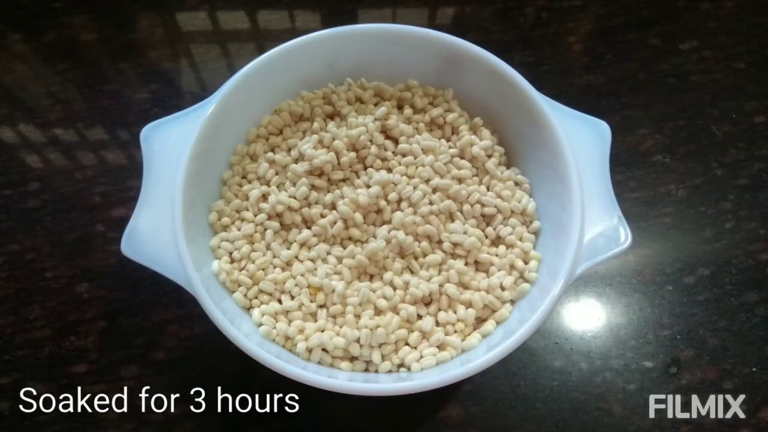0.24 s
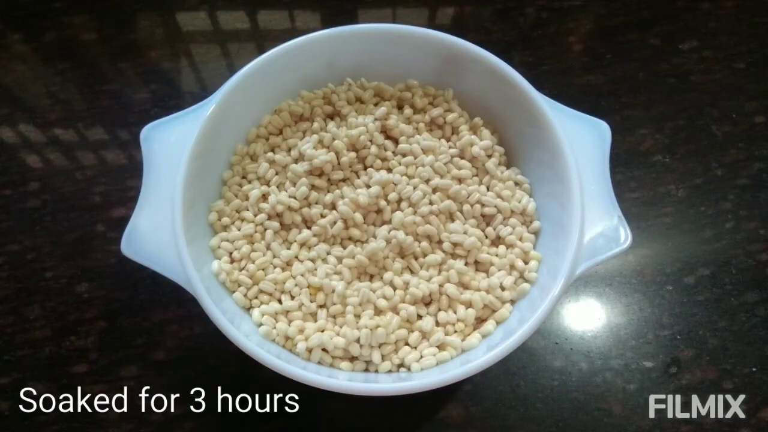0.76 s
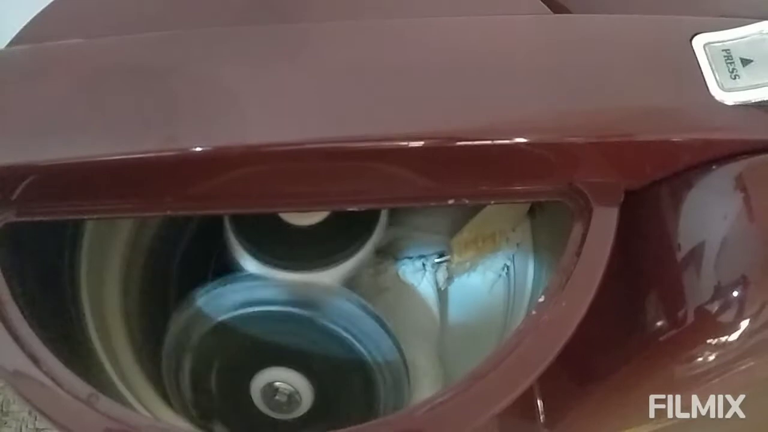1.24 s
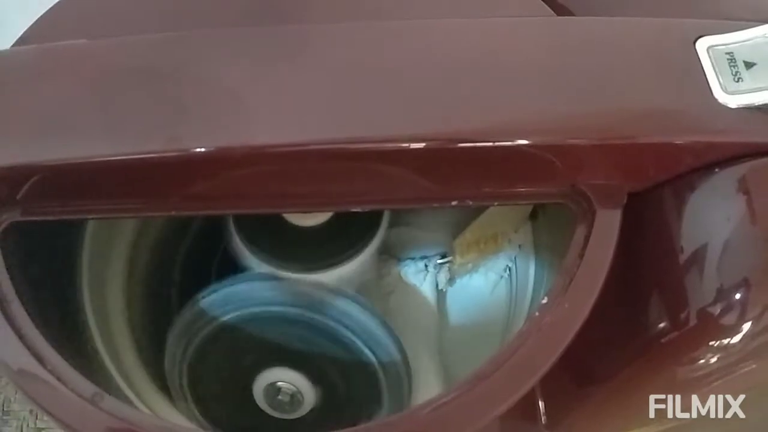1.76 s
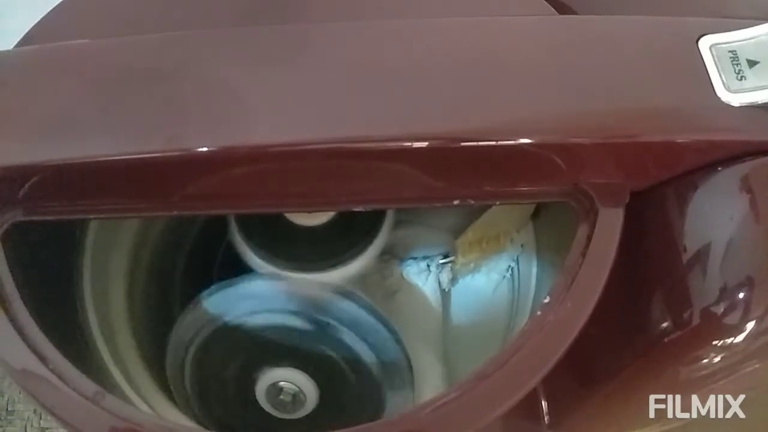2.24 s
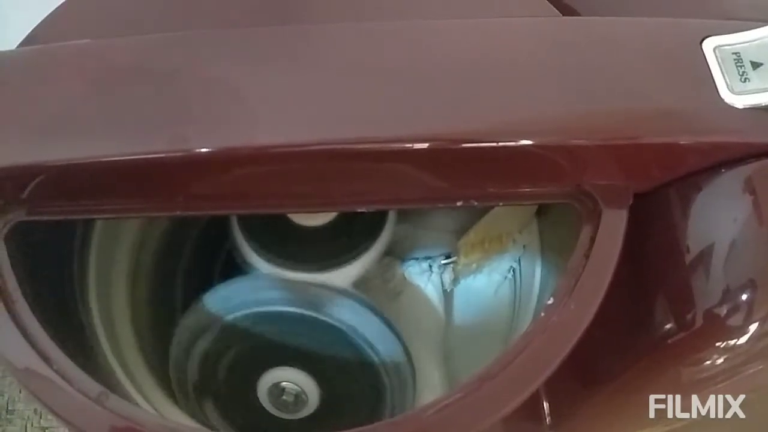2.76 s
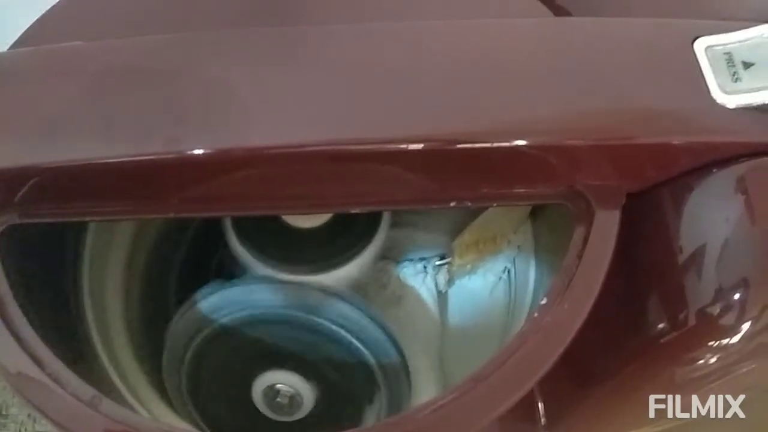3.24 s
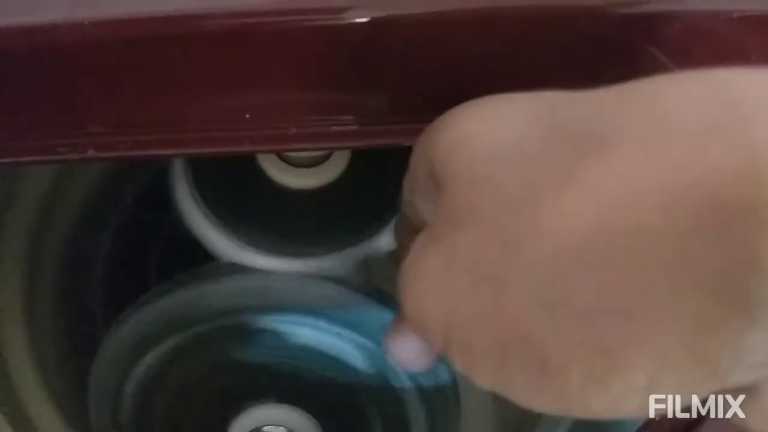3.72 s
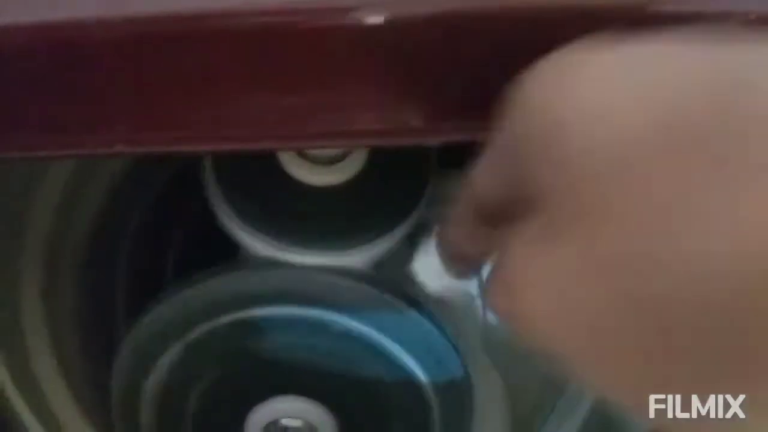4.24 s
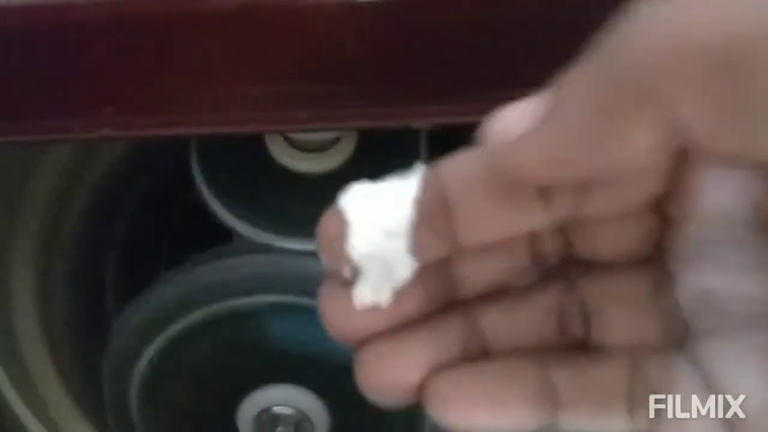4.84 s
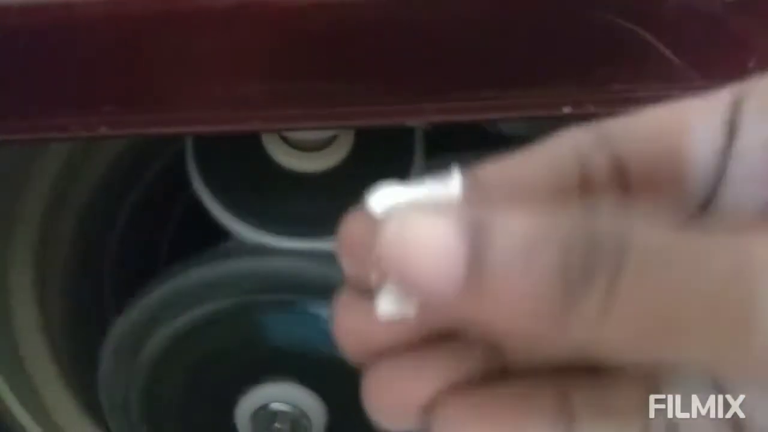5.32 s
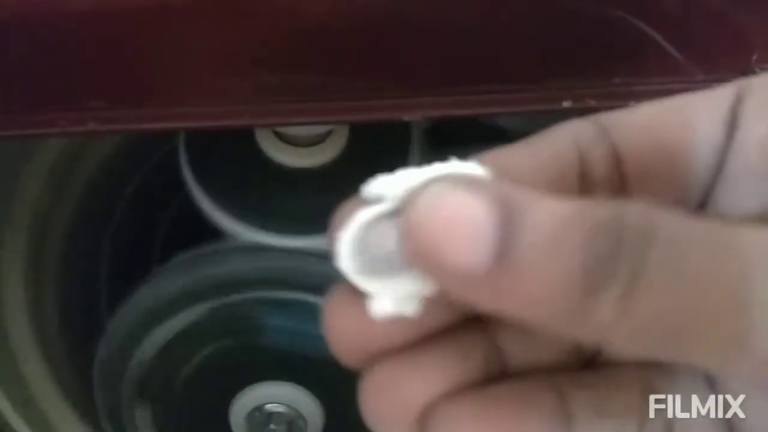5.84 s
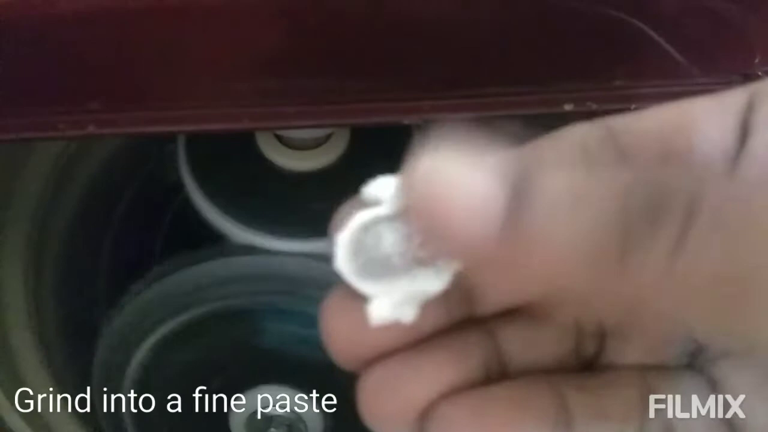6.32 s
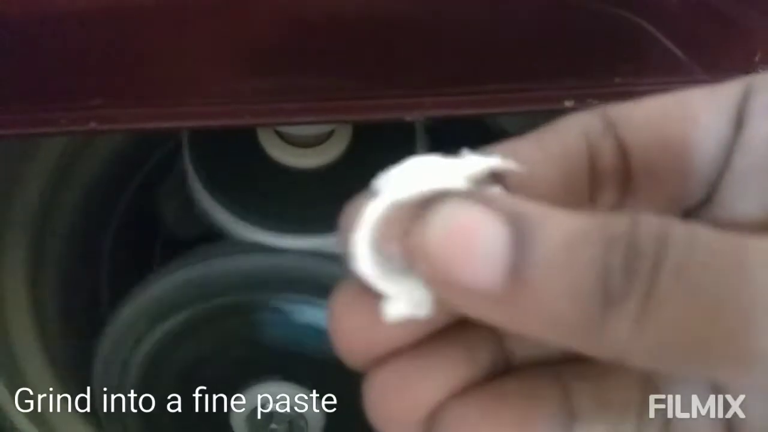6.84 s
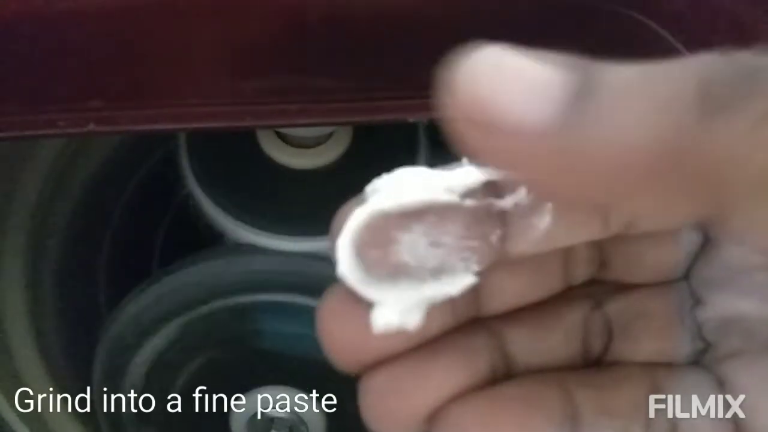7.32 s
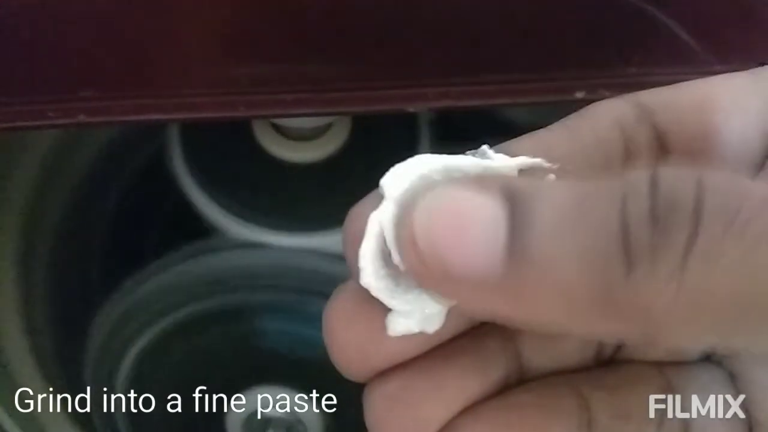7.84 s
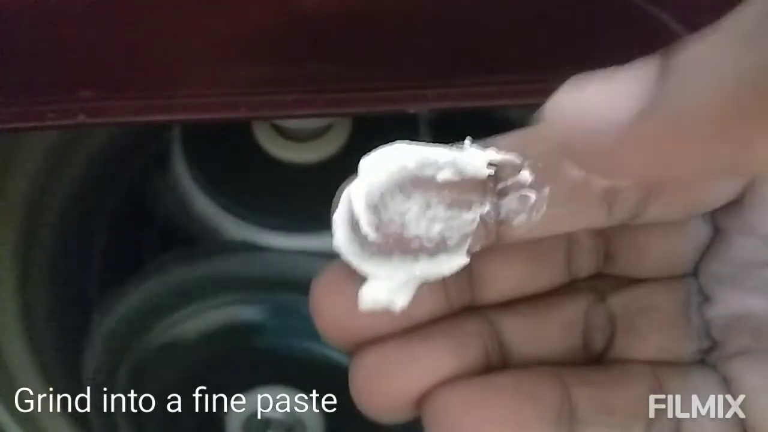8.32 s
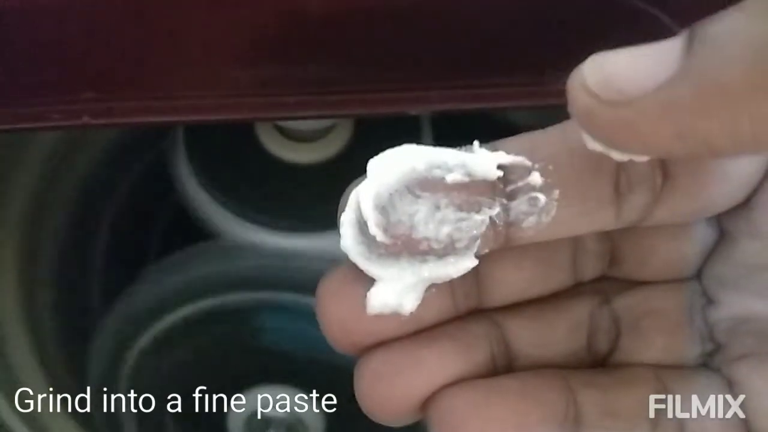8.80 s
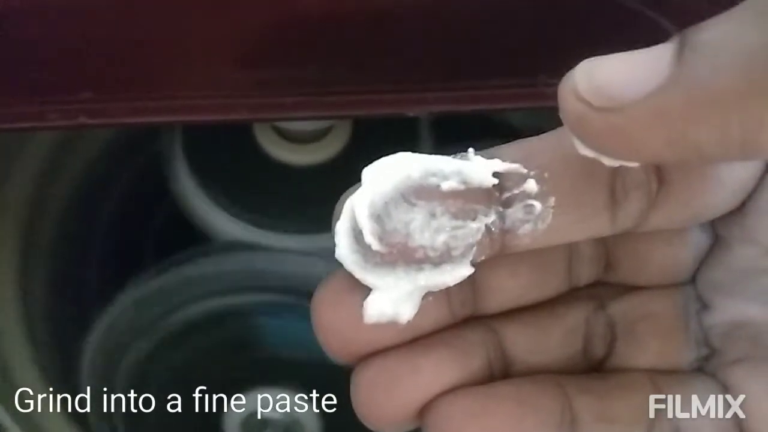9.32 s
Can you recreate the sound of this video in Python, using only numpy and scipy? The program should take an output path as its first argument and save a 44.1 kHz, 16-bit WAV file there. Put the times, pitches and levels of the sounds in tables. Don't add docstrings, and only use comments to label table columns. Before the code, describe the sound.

Silence first, then a continuous low drum rumble with mid-range stone rasp and bright, wet, slurping hiss pulsing slightly more than once a second. Soft hollow hums, squirts of grit and small ticks break the surface. The sound drops out for an instant and fades back in stronger, rougher and more crackly, swelling towards the end. Close stereo phone pickup, uneven between sides, slightly grainy, little room sound.

```python
import sys
import numpy as np
from scipy import signal
from scipy.fft import rfft, irfft, next_fast_len
from scipy.io import wavfile
from scipy.ndimage import uniform_filter1d, map_coordinates

SR = 44100
rng = np.random.default_rng(int(sys.argv[2]) if len(sys.argv) > 2 else 0)


def linear_from_db(decibels):
    return 10 ** (np.asarray(decibels, float) / 20)


def wrap_up_sound(samples):
    columns = np.atleast_2d(samples).T
    tamed = np.clip(columns, -1, 1)
    steps = np.round(tamed * 32767).astype(np.int16)
    wavfile.write(sys.argv[1], SR, steps)


N = 421596

# start in seconds, end in seconds.
SHOTS = [
    (.912, 3.386),
    (3.412, 9.56),
]
FADE_IN_S, FADE_IN_POWER, FADE_OUT_S = .28, .66, .055

# time in seconds, load on the stones in dB, grit between them in dB.
WORK = [(1.0, -29, -37), (2.2, -30, -35.5), (3.38, -26.5, -34.5), (3.42, -26, -31.5), (4.4, -27.5, -33),
        (5.25, -26, -32), (5.45, -25, -30), (6.3, -23.5, -28.5), (7.4, -22, -27.5), (7.9, -23.5, -25.5),
        (8.4, -21, -25.5), (9.0, -19.5, -27), (9.56, -20.5, -25)]
# time in seconds, swell in dB, half width in seconds.
LUMPS = [(1.18, 2.5, 0.022), (1.51, 3, 0.11), (1.93, 3.5, 0.065), (2.39, 4, 0.088), (2.7, 2.5, 0.097),
         (3.04, 1.5, 0.14), (3.22, 0, 0.017), (3.74, 1, 0.035), (3.91, 2.5, 0.038), (4.3, 4, 0.096),
         (4.758, 5.5, 0.071), (5.402, 9.5, 0.016), (5.5, 2.5, 0.052), (5.72, 0.5, 0.064),
         (5.95, 0.5, 0.038), (6.19, 5, 0.039), (6.88, 2, 0.067), (7.25, -2, 0.031), (7.61, 4.5, 0.13),
         (7.97, 2.5, 0.12), (8.14, 1.5, 0.048), (8.598, 3.5, 0.093), (8.78, 0, 0.042), (8.97, 3, 0.03),
         (9.2, -1, 0.027), (9.45, 2, 0.041)]
# pitch in Hz, width in Hz, level in dB.
DRUM = [(102.7, 10, -28.5), (125.1, 18, -9), (174.7, 20, -5), (201.2, 13, 2), (236.2, 18, -2),
        (292, 24, -2.5), (326.2, 25.7, -7), (372.6, 8.8, -1.5), (451.7, 11, -3), (506.3, 23, -13),
        (554.8, 26, -8.5)]
# pitch in Hz, width in Hz, level in dB.
WALL = [(672, 30.5, -5), (766, 48, 0), (834.4, 52, -1), (891, 35, -3.5), (990.6, 50, -4), (1126, 38, -5.5),
        (1212, 86, -9.5), (1371, 62, -13), (1555, 63, -20.5), (2016, 99, -24), (2508, 120, -23.5)]
# frequency in Hz, level in dB per Hz.
UNDER = [(12, -70), (20, -25), (65, -28.5), (101, -17), (204, -1.5), (493, -4.5), (554, -4), (640, -3.5),
         (830, -41.5), (1410, -120)]
# frequency in Hz, level in dB per Hz.
RASP = [(820, -25.5), (1400, 0), (1850, -7), (2250, -8), (2510, -7), (3400, -13.5), (3780, -14),
        (4200, -15.5), (5460, -15), (9240, -120)]
UNDER_DB = (-6.5, -9.5)
BOOM_HZ, BOOM_DB = 146, (2, -1.5)
WALL_DB, RASP_DB = (-6, -6.5), (-14, -19.5)
WALL_SWELLS, RASP_SWELLS = 0.7, 1

# frequency in Hz, level in dB per Hz.
SLURP = [(2240, -50.5), (3800, -12.5), (4660, -17.5), (5990, -6.5), (7010, -5.5), (8600, 1), (11200, -40),
         (18900, -120)]
HISS = [(4880, -25), (8300, -11), (9130, 7), (9640, 1.5), (10400, 6), (12200, 0.5), (15900, -24.5),
        (22000, -120)]
FIZZ = [(7000, -34.5), (11900, 5), (14300, 1), (15200, -1.5), (15900, -14)]
# swells a turn, depth in dB and phase in cycles
# in the first shot, depth in dB and phase in cycles in the second.
HISS_TURN = [(1, 0.49, 0.64, 0.89, -.16), (2, 1.8, -0.21, 1.6, .42), (3, 3.8, -.44, 1.3, .42),
             (4, 1.6, -.28, 0.22, -.13), (5, 2.3, -.2, 1.4, .27)]
FIZZ_TURN = [(1, 2.9, -0.071, 1.8, 0.0096), (2, 1.3, -0.31, 0.46, 0.41), (3, 0.28, 0.059, 0.16, -0.086),
             (4, 1, -0.23, 0.45, -0.5), (5, 0.27, 0.33, 0.58, -0.027)]
SLURP_TURN = [(1, 3.8, -.02, 1.8, .03), (2, 3.2, -0.16, 0.43, -0.4), (3, 0.25, -0.13, 0.9, 0.39),
              (4, 0.35, 0.16, 0.84, 0.54)]
TURN_HZ = 1.242
FIZZ_DB, SLURP_DB = (-1, -4), (-8, -7.5)
GRIT_PAN_DB, CRACK_PAN_DB = (-11, 0.5), (-12.5, 9.5)
SPURTS_PER_S, SPURT_DB, SPURT_S = 40, 2.1, .011

# frequency in Hz, width in Hz, seconds after the pass.
SCRAPE = [(14200, 900, -.028), (13000, 800, 0), (11800, 800, .022)]
SCRAPE_S, SCRAPE_DB = (.985, 3.345), (6, 3.5)
SCRAPE_HALF_S = .018

# time in seconds, pitch in Hz, level in dB.
RINGS = [(1.178, 298, -37), (1.192, 212, -38), (1.213, 448, -33), (1.282, 284, -28), (1.497, 296, -24.5),
         (1.503, 549, -34), (1.591, 119, -34), (1.62, 934, -37), (2.287, 292, -25), (2.393, 213, -27.5),
         (2.4, 398, -26.5), (2.728, 234, -35), (2.873, 280, -25.5), (2.965, 559, -34), (3.019, 373, -24),
         (3.054, 119.5, -31), (3.228, 810, -36), (3.228, 964, -31), (3.246, 297, -21), (3.756, 194, -21),
         (3.831, 1006, -31.5), (4.249, 740, -29), (4.76, 433, -28), (5.393, 324, -27), (5.393, 1085, -30),
         (5.498, 193, -23.5), (5.78, 193, -28), (5.87, 202, -28), (5.943, 201, -22), (6.13, 204, -25.5),
         (6.223, 552, -26), (6.409, 444, -23.5), (6.764, 289, -23), (6.803, 445, -22), (6.885, 716, -30),
         (6.908, 800, -27), (7.07, 383, -28), (7.1, 280, -29), (7.2, 248, -30), (7.483, 242, -20.5),
         (7.587, 380, -30), (7.55, 197, -21), (7.628, 199, -14), (7.7, 199, -21), (8.329, 198, -26),
         (8.552, 184, -18), (8.591, 775, -24), (8.597, 293, -24.5)]
RING_DB, RING_RISE_S, RING_FALL_S = 1, .014, 0.036

# time in seconds, pitch in Hz, swell in dB.
BURSTS = [(1.2, 9700, 10), (1.303, 10800, 13.5), (1.37, 11400, 14.5), (1.409, 11500, 10),
          (1.472, 12100, 10), (1.67, 15300, 7), (1.741, 11200, 13.5), (1.787, 13800, 16), (1.836, 14000, 8),
          (2.367, 8700, 6), (2.368, 10700, 15.5), (2.461, 13000, 11), (2.571, 10200, 16.5),
          (2.611, 12700, 12), (2.615, 15000, 10), (2.653, 10550, 16), (3.043, 11900, 9), (3.106, 13700, 3),
          (3.143, 11500, 3), (3.147, 14600, 4), (3.274, 12900, 10.5), (3.702, 10700, 3), (3.746, 8900, 3),
          (3.874, 10000, 8), (3.907, 9000, 9), (4.039, 15300, -4), (4.07, 10100, 11), (4.146, 12500, 5),
          (4.505, 11500, 3), (4.807, 11400, 10), (4.928, 15000, 8), (4.949, 13000, 4), (5.002, 9000, 8),
          (5.352, 9900, 12), (5.388, 10000, 11.5), (5.618, 12200, 7), (5.65, 15300, 1), (5.673, 8300, -1),
          (5.722, 15200, -5), (5.753, 12800, 5), (6.163, 10160, 12), (6.249, 12100, 8), (6.539, 15000, 7),
          (6.594, 10000, 5), (6.964, 8800, -6), (7.32, 15200, 0), (7.368, 12600, 7), (7.396, 9800, 11),
          (7.76, 9650, 6), (8.161, 13600, 4), (8.195, 8950, 10.5), (8.606, 8400, -3), (8.862, 14200, 5),
          (8.936, 15500, 4), (8.969, 12500, 8.5), (9.407, 9000, 10.5), (9.498, 12000, 4), (9.535, 13100, 2)]
BURST_DB, BURST_HALF_S, BURST_WIDTH_HZ = -3.5, 0.012, 1000

# time in seconds, peak in dB, high spray in dB, thud in dB.
CRACKS = [(1.249, -26, -5, 3), (1.8921, -22.5, -5, -1), (2.2957, -27.5, -3, -5), (2.7342, -28.5, 9, 3),
          (2.9736, -22.5, -4, 1), (3.7609, -25, -4, -6), (4.2438, -25, -4, 8), (4.5083, -22.5, -1, 4),
          (4.6838, -22, 0, 1), (4.924, -22.5, 1, 2), (5.376, -13.5, 2, 11), (5.388, -30, -6, 17),
          (5.4231, -17.5, 5, -10), (5.67, -13, -11, 2), (5.8554, -12, -14, -12), (5.9284, -20.5, -1, -7),
          (6.106, -18, 4, 4), (6.25, -15.5, -1, 4), (6.553, -15.5, 1, -1), (6.6181, -15, -10, -1),
          (6.697, -14.5, 7.5, 1), (6.9222, -14, -3, 4), (6.9616, -15.5, -9, 4), (7.3113, -16, -4, -6),
          (7.5321, -8.5, 4.5, -19), (7.626, -14, 1, -11), (7.669, -12.5, 3.5, -7), (8.6875, -8.5, 5, 10),
          (8.7326, -16, -5, 2), (8.9554, -12, -10, -1), (9.178, -16, 6, 4)]
# time in seconds, peak in dB.
TICKS = [(1.2987, -19), (1.6444, -27), (1.776, -24), (2.582, -18), (2.7492, -18.5), (2.8587, -22),
         (3.0767, -21), (3.2192, -13), (3.2615, -18), (4.0329, -27), (4.123, -20), (4.3144, -16),
         (4.3834, -17.5), (5.0417, -15), (5.2467, -16), (5.534, -9), (5.875, -8.5), (5.9494, -10.5),
         (5.972, -13.5), (6.0442, -12), (6.6815, -20), (6.9022, -14), (7.128, -16), (7.216, -10.5),
         (7.3, -23), (7.418, -8), (7.4635, -6), (7.811, -15.5), (7.8994, -16), (7.9421, -15), (8.113, -19),
         (8.1381, -13), (8.4948, -9), (8.627, -20), (8.6414, -10.5), (8.869, -9), (8.937, -20),
         (9.2366, -12), (9.5124, -20)]
TICK_DB, TICK_TOP_DB, TICK_THUD_DB = -9, 11.5, 7
# frequency in Hz, level in dB per Hz.
SNAP = [(2500, -70), (3800, -11), (5500, 0.5), (7500, 5), (8600, 5), (9500, -24.5), (11000, -58)]

# time in seconds, peak in dB, left over right in dB.
KNOCKS = [(1.875, -29, 11), (4.468, -22.5, -3), (5.3883, -15.5, -8), (6.1188, -27.5, 2), (6.288, -24, -2),
          (6.821, -32, -6), (7.2723, -25, 2), (7.695, -25, 1), (7.9152, -26, 0), (7.996, -28, -2),
          (8.4437, -28, -17), (8.7588, -32, -2), (8.95, -22.5, -5), (9.0975, -22.5, -7)]

# frequency in Hz, left-right correlation from -1 to 1.
ALIKE = [(60, 0.86), (150, 0.96), (380, 0.88), (950, 0.56), (2380, 0.05), (4000, -0.14), (6500, 0.3),
         (8200, 0.1), (9600, 0.45), (11000, 0.0), (15000, 0.015)]
# frequency in Hz, left over right in dB.
LEAN = [(60, 5), (130, -2.5), (290, -1.0), (640, -1.5), (1410, -3.5), (3100, 1.5), (6820, 3.5),
        (15000, 18.5)]
# frequency in Hz, width in Hz.
NOTCH = [(3400, 200), (4520, 190)]
# delay in seconds, level in dB.
ECHOES = [(.0016, -15), (.0047, -14), (.0083, -14), (.0131, -15), (.0197, -16)]
# frequency in Hz, level in dB, left over right in dB.
EARLY_COLOUR = [(1220, 0.5, 1), (2010, 0.5, 3), (2770, -1.5, 1), (3170, -3, -3.5), (3400, 4, -1.5),
                (3640, -2.5, -0.5), (6400, -1.5, -1.5), (9000, 0, -5.5), (11500, -0.5, 8.5), (15000, 7, -6)]
# frequency in Hz, lead in radians.
LEAD = [(60, 0), (250, .2), (800, .4), (2200, .3), (4000, 0)]
# frequency in Hz, step over the masking level in dB.
COARSE = [(1300, -18), (1900, 2), (2600, 7), (3400, 9.3), (6000, 9.5), (8600, 9.5), (10000, 5),
          (13000, 4.5), (15000, 5.5), (16000, 6)]
# frequency in Hz, step in dB.
EARLY = [(5000, -1), (9000, 2), (11000, 3), (13500, 4.5), (15500, 8.5)]
TOP_HZ = 15900


def unit(x):
    return x / np.sqrt(np.mean(x ** 2) + 1e-20)


def along(points, hz):
    f, v = np.transpose(points)
    return np.interp(np.log(hz + 1), np.log(f + 1), v)


def curves(rows):
    s, *cols = np.transpose(rows)
    return [np.interp(np.arange(N) / SR, s, c) for c in cols]


def wobble(rate):
    knots = rng.standard_normal(int(N * rate / SR) + 4)
    return map_coordinates(knots, [np.arange(N) * rate / SR])


def per_shot(pair):
    return np.where(np.arange(N) / SR < SHOTS[0][1], *pair)


def per_turn(table):
    angle = 2 * np.pi * TURN_HZ * np.arange(N) / SR
    pattern_db = 0
    for swells, db, at, db2, at2 in table:
        phase = 2 * np.pi * per_shot((at, at2))
        pattern_db = pattern_db + per_shot((db, db2)) * np.cos(round(swells) * angle - phase)
    return pattern_db


def panned(pan_db):
    return linear_from_db(np.outer([.5, -.5], pan_db))


def filtered(x, response):
    m = next_fast_len(N + 8192)
    return irfft(rfft(x, m) * response(np.fft.rfftfreq(m, 1 / SR)), m)[..., :N]


def modes(table):
    def response(f):
        total = 0
        for k, (c, w, db) in enumerate(table):
            total = total + (-1) ** k * linear_from_db(db) * 1j * f * w / (c * c - f * f + 1j * f * w)
        return total
    return response


def shape(points):
    return lambda hz: linear_from_db(along(points, hz))


def contacts(lump_db, rate, patchy_db):
    z = signal.stft(rng.standard_normal((2, N)), nperseg=256)[2]
    field = uniform_filter1d(rng.standard_normal(z.shape[1:]), size=5, axis=0)
    field = uniform_filter1d(field, size=12, axis=1)
    pair = signal.istft(z * linear_from_db(patchy_db * unit(field)), nperseg=256)[1][:, :N]
    return pair * linear_from_db(lump_db * wobble(rate))


def spurts():
    starts = (rng.random(N) < SPURTS_PER_S / SR) * rng.exponential(SPURT_DB, N)
    gain_db = signal.lfilter([1], [1, -np.exp(-1 / (SPURT_S * SR))], starts)
    return linear_from_db(np.minimum(gain_db, 6))


def ports(hz):
    dips = np.prod([1 - .42 * np.exp(-((hz - c) / w) ** 2) for c, w in NOTCH], axis=0)
    ripple = sum(linear_from_db(db) * np.cos(2 * np.pi * hz * s) for s, db in ECHOES)
    return dips * (1 + ripple * np.clip(hz / 2000 - .7, 0, 1))


def heard(pair, response):
    def mix(hz):
        turn = np.arccos(np.clip(along(ALIKE, hz), -1, 1)) / 2
        blend = [[np.cos(turn), np.sin(turn)], [np.cos(turn), -np.sin(turn)]]
        return response(hz) * ports(hz) * panned(along(LEAN, hz))[:, None] * blend
    m = next_fast_len(N + 8192)
    both = irfft((rfft(pair, m) * mix(np.fft.rfftfreq(m, 1 / SR))).sum(1), m)[:, :N]
    return both / np.std(both.mean(0))


def rollers():
    load_db, t = curves(WORK)[0], np.arange(N) / SR
    swell_db = sum(db * np.exp(-((t - s) / width) ** 2) for s, db, width in LUMPS)
    bumps = contacts(lump_db=1.0, rate=90, patchy_db=0.38) * linear_from_db(0.7 * wobble(14))
    under = heard(contacts(lump_db=0.5, rate=27, patchy_db=2.5), shape(UNDER))
    drum = unit(heard(bumps, modes(DRUM)) + linear_from_db(per_shot(UNDER_DB)) * under)
    boom = filtered(drum, lambda hz: 1 / (1 + (hz / BOOM_HZ) ** 12))
    drum = drum + (linear_from_db(per_shot(BOOM_DB)) - 1) * boom
    jolts = bumps * linear_from_db(1.3 * wobble(250) + 1.0 * wobble(35)) * spurts() ** .5
    wall = heard(jolts, modes(WALL))
    rasp = heard(contacts(lump_db=2.0, rate=120, patchy_db=2.0), shape(RASP))
    total = linear_from_db(-0.14 + swell_db) * drum
    total = total + linear_from_db(per_shot(WALL_DB) + WALL_SWELLS * swell_db) * wall
    total = total + linear_from_db(per_shot(RASP_DB) + RASP_SWELLS * swell_db) * rasp
    return linear_from_db(load_db) * total


def grit():
    flutter = linear_from_db(.8 * wobble(40) - .6)
    hiss = heard(contacts(lump_db=2.0, rate=400, patchy_db=2.6), shape(HISS))
    hiss = hiss * linear_from_db(1.2 * wobble(35)) * spurts()
    fizz = heard(contacts(lump_db=0.0, rate=320, patchy_db=2.6), shape(FIZZ))
    fizz = fizz * linear_from_db(1.2 * wobble(35)) * spurts()
    slurp = heard(contacts(lump_db=1.0, rate=200, patchy_db=4.0), shape(SLURP)) * spurts()
    total = linear_from_db(per_turn(HISS_TURN)) * hiss
    total = total + linear_from_db(per_shot(FIZZ_DB) + per_turn(FIZZ_TURN)) * fizz
    total = total + linear_from_db(per_shot(SLURP_DB) + per_turn(SLURP_TURN)) * slurp
    sides = panned(per_shot(GRIT_PAN_DB) + 1.1 * wobble(8))
    return linear_from_db(curves(WORK)[1]) * flutter * sides * total


def scraper():
    turns = (np.arange(N) / SR - per_shot(SCRAPE_S)) * TURN_HZ
    rub = heard(contacts(lump_db=1.5, rate=460, patchy_db=2.5), lambda hz: hz > 9000)
    swish = 0
    for c, w, late in SCRAPE:
        away_s = ((turns - late * TURN_HZ + .5) % 1 - .5) / TURN_HZ
        band = unit(filtered(rub, lambda hz: np.exp(-((hz - c) / w) ** 2)))
        swish = swish + band * np.exp(-(away_s / SCRAPE_HALF_S) ** 2)
    return linear_from_db(curves(WORK)[1] + per_shot(SCRAPE_DB)) * panned(per_shot(GRIT_PAN_DB)) * swish


def rings():
    t, tone = np.arange(N) / SR, np.zeros(N)
    drift = 2 * np.pi * np.cumsum(8 * wobble(40)) / SR
    for s, pitch_hz, db in RINGS:
        at = slice(round((s - .08) * SR), round((s + .14) * SR))
        after = t[at] - s + RING_RISE_S / 2
        swell = np.exp(-(after / np.where(after < 0, RING_RISE_S, RING_FALL_S)) ** 2)
        tone[at] += linear_from_db(db + RING_DB) * swell * np.sin(2 * np.pi * pitch_hz * after + drift[at])
    return tone * linear_from_db([[-.7], [.7]])


def bursts():
    size = 4096
    puffs = np.zeros((2, N + size))
    t, hz = (np.arange(size) - size / 2) / SR, np.fft.rfftfreq(size, 1 / SR)
    swell = np.exp(-(t / BURST_HALF_S * np.where(t < 0, 1.6, .8)) ** 2)
    for s, pitch_hz, db in BURSTS:
        colour = np.exp(-((hz - pitch_hz) / BURST_WIDTH_HZ) ** 2)
        band = irfft(rfft(rng.standard_normal((2, size))) * colour, size)
        sides = panned(along(LEAN, pitch_hz) + GRIT_PAN_DB[int(s > SHOTS[0][1])])
        puffs[:, round(s * SR) - size // 2:][:, :size] += linear_from_db(db) * sides * unit(band) * swell
    return linear_from_db(curves(WORK)[1] + BURST_DB) * puffs[:, :N]


def cracks():
    snap, spray, blow = np.zeros((3, 2, N + 2048))
    t = np.arange(2048) / SR
    splinters = [(s, db + TICK_DB, TICK_TOP_DB, TICK_THUD_DB) for s, db in TICKS]
    for s, db, top_db, thud_db in CRACKS + splinters:
        envelope = linear_from_db(db + 6 - 60 * t / .015) * (1 - np.exp(-t / .0011))
        burst = envelope * rng.standard_normal((3, len(t)))
        sides = panned(CRACK_PAN_DB[int(s > SHOTS[0][1])])
        at = slice(round(s * SR), round(s * SR) + len(t))
        snap[:, at] += sides * (burst[0] + 1.0 * burst[1:])
        spray[:, at] += sides * linear_from_db(top_db) * burst[1:]
        blow[:, at] += linear_from_db(thud_db) * burst[0]
    high = linear_from_db(-2.5) * filtered(snap[:, :N], shape(SNAP)) + linear_from_db(-7.0) * filtered(spray[:, :N], shape(HISS))
    return high + linear_from_db(3.5) * filtered(blow[:, :N], modes(DRUM + WALL))


def knocks():
    clack, t = np.zeros((2, N + 2048)), np.arange(2048) / SR
    for s, db, pan_db in KNOCKS:
        burst = linear_from_db(db - 60 * t / 0.042) * rng.standard_normal((3, len(t)))
        clack[:, round(s * SR):][:, :len(t)] += panned(pan_db) * (burst[0] + 0.78 * burst[1:])

    def stone(hz):
        return shape(RASP)(hz) * linear_from_db(0.66 * np.exp(-((hz - 3800) / 1300) ** 2))
    return linear_from_db(5.5) * filtered(clack[:, :N], stone)


def angled(x):
    hz, db, pan_db = np.transpose(EARLY_COLOUR)
    first = filtered(x, lambda f: linear_from_db(along(np.c_[hz, db], f)) * panned(along(np.c_[hz, pan_db], f)))
    second = filtered(x, lambda f: np.exp(1j * np.outer([-.5, .5], along(LEAD, f))))
    return per_shot((first, second))


def scene():
    return angled(rollers() + grit() + scraper() + rings() + bursts() + cracks() + knocks())


def thinned(x, wander_db, band_db, crest_db):
    size, start = 1024, 420
    n = np.arange(2 * size) + .5
    basis = np.sin(np.pi * n / (2 * size))[:, None] * np.cos(np.pi / size * np.outer(n + size / 2, n[:size]))
    basis = (basis * np.sqrt(2 / size)).astype(np.float32)
    line, line_hz = n[:size], n[:size] * SR / (2 * size)
    count = N // size + 2
    frame = np.arange(count) * size
    moment = np.minimum(frame, N - 1)
    pair = np.pad([x[0] + x[1], x[0] - x[1]], ((0, 0), (2 * size - start, 2 * size)))
    halves = pair[:, :(count + 1) * size].reshape(2, -1, size).astype(np.float32)
    lines = halves[:, :-1] @ basis[:size] + halves[:, 1:] @ basis[size:]

    mask = np.sqrt(np.abs(uniform_filter1d((lines ** 2).mean(0), size=48, axis=1)) + 1e-14)
    mask = mask.reshape(count, -1, 16).mean(2).repeat(16, 1)

    budget_db = wander_db * wobble(18)[moment]
    treble = signal.lfilter(*signal.butter(2, [3500, 8300], 'band', fs=SR), halves[0].ravel())
    sharp = uniform_filter1d(treble ** 2, size=64).reshape(-1, size)
    crest = 10 * np.log10(sharp.max(1) / (sharp.mean(1) + 1e-14) + 1e-9)
    budget_db = budget_db - 2 * np.clip(np.maximum(crest[1:], crest[:-1]) - crest_db, 0, 4)

    in_first = frame / SR < SHOTS[0][1]
    early = np.outer(in_first, along(EARLY, line_hz))
    luck = unit(uniform_filter1d(rng.standard_normal((count, size // 16)), size=2, axis=0)).repeat(16, 1)
    risk = unit(uniform_filter1d(rng.standard_normal((2, count, size // 32)), size=2, axis=1)).repeat(32, 2)
    risk = risk + early / 14 + .5 * (early > 1) * (line < 640)
    risk = risk + .6 * (np.abs(line - 280) < 130)
    risk = risk + .5 * (early == 0) * (np.abs(line - 352) < 64)
    lost = risk + np.minimum(budget_db, 0)[:, None] / 2 > 2.35
    luck = luck + 8 * lost * (line > 144)
    step = mask * linear_from_db(along(COARSE, line_hz) + budget_db[:, None] + band_db * luck + early)
    size_kept = step * np.floor((np.abs(lines) / step) ** .75 + .4054) ** (4 / 3)
    lines = (np.sign(lines) * size_kept).astype(np.float32)

    sag = np.maximum(wobble(14)[moment] + 1.6 * in_first - 1.5, 0)
    ceiling = 740 - 16 * np.round(1.3 * sag ** 1.6)
    lines = lines * (line < ceiling[:, None]).astype(np.float32)
    halves = np.pad(lines @ basis[:size].T, ((0, 0), (0, 1), (0, 0)))
    halves = halves + np.pad(lines @ basis[size:].T, ((0, 0), (1, 0), (0, 0)))
    mid, side = halves.reshape(2, -1)[:, 2 * size - start:][:, :N]
    return np.array([mid + side, mid - side], float) / 2


def shot_fades():
    t, gate = np.arange(N) / SR, 0
    for a, b in SHOTS:
        rise = np.clip((t - a) / FADE_IN_S, 0, 1) ** FADE_IN_POWER
        gate = gate + rise * np.clip((b - t) / FADE_OUT_S + (b > 9), 0, 1) ** 2
    return gate


def top_cut(x):
    return signal.sosfilt(signal.butter(12, 16100, fs=SR, output="sos"), x)


def record(dry):
    limited = dry / (1 + np.abs(dry / .72) ** 4) ** .25
    phone = thinned(limited, wander_db=1.0, band_db=3.6, crest_db=7.5)
    mix = filtered(phone, lambda hz: hz < TOP_HZ) * shot_fades()
    return top_cut(mix)


dry = scene()
out = record(dry)
wrap_up_sound(out)
```